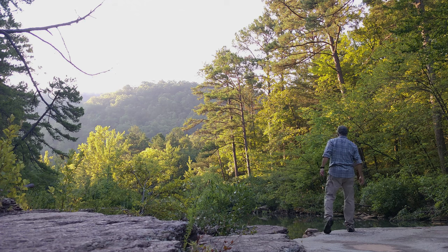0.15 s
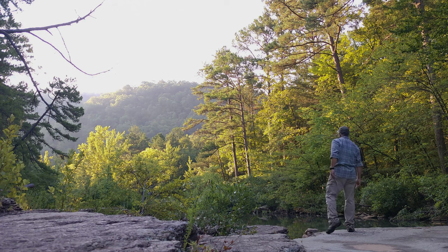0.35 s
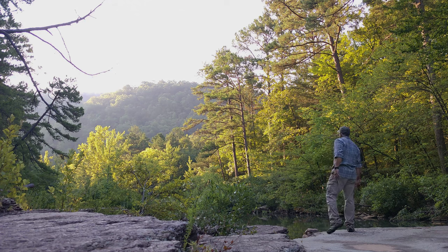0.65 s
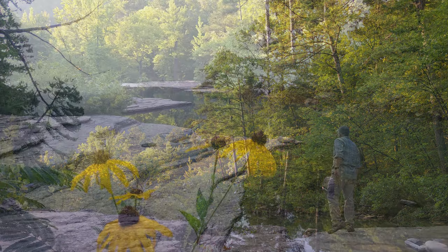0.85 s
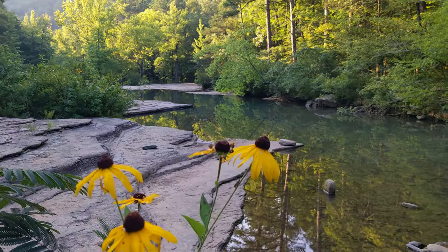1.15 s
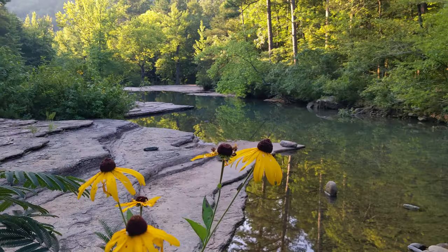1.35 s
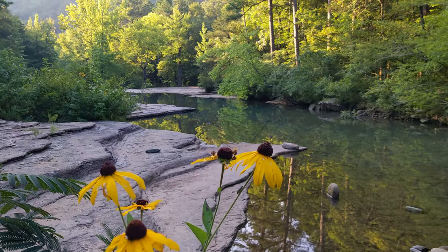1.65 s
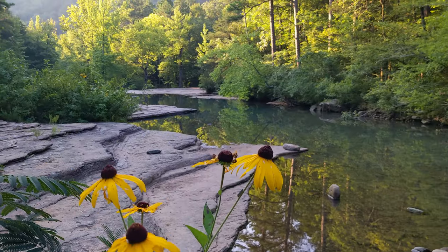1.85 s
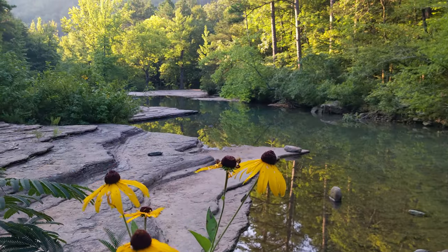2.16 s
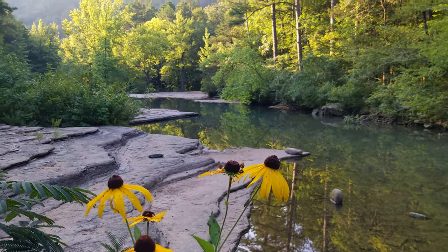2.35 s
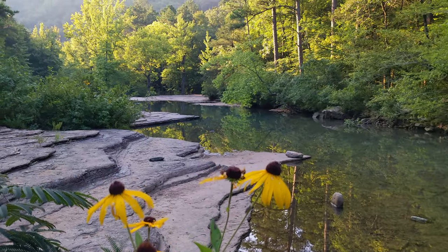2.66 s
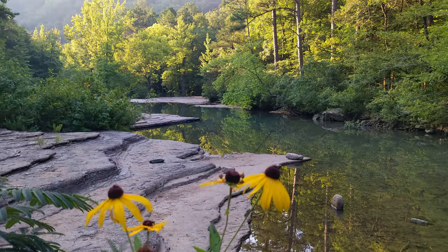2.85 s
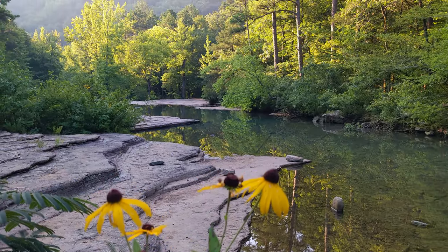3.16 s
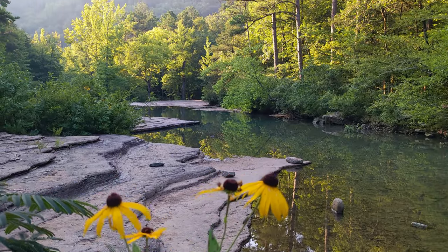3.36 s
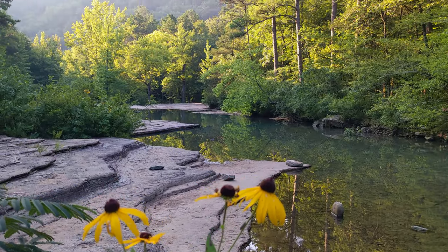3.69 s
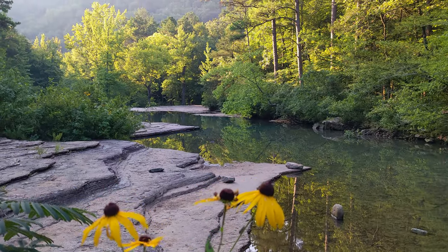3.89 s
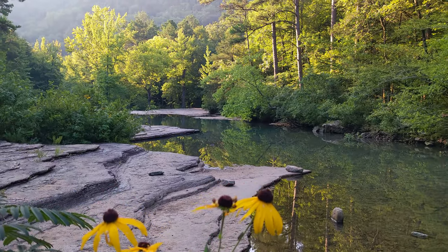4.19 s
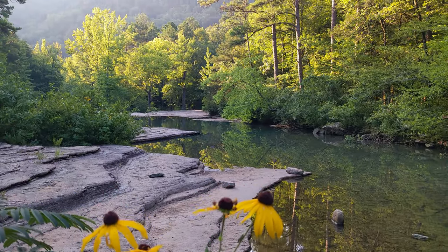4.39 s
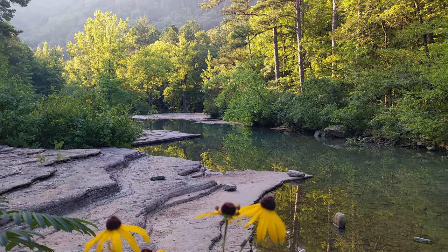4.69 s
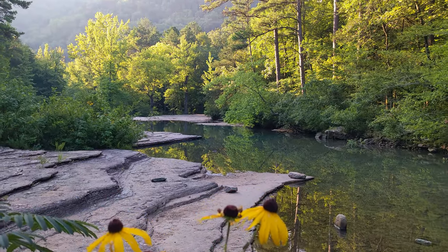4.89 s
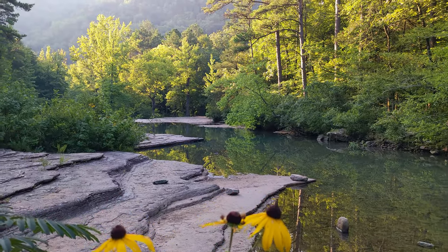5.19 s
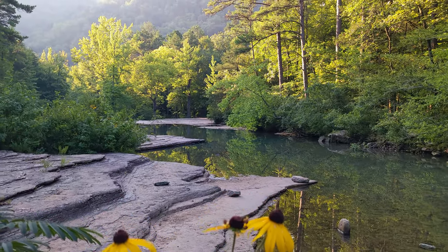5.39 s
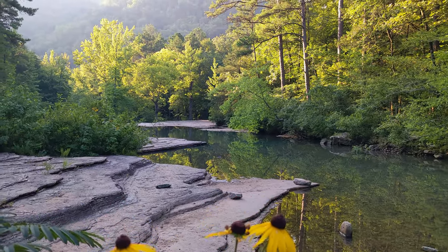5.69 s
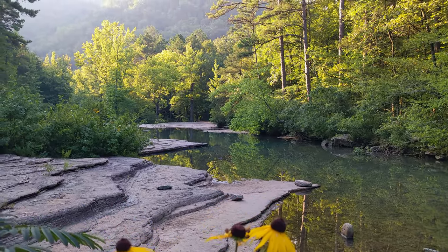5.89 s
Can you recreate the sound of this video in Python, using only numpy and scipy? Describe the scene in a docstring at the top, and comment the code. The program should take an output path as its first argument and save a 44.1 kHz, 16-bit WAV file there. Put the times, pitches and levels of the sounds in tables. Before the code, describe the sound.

From 0 to 0.9 s, an open rock ledge: soft airy noise, low rumble with a brief bump near 0.5, and blurred distant cicadas around 5 to 6 kHz, mostly to the right. An echo tail of a bird chip opens it; a sharp, quickly falling chip sounds at 0.62. At 0.9 an abrupt cut to the creek bank. A close cicada on the right buzzes steadily to the end, about 31 throbs per second, each sagging slightly in pitch; a farther, slightly faster one drifts against it over a hissing chorus. Faint bird slurs and twitter run from 0.9 to 1.8, again around 3.3 to 3.8, with a last note near 6. Quiet creek wash and tiny bubbles gradually rise. Small falling knocks tap on the left-weaker, right side at 1.0, 1.3, 1.8, 1.9, 2.4, 2.8, 3.0, a cluster near 4.5, and 5.0. Rumble swells around 5.5. Light microphone hiss leans left.

```python
"""A cicada throbs close by on the right, with a farther one slowly overtaking it, on the bank of a creek.
Each throb is a squeeze of the tymbals: a falling sine and overtones, rippled by ribs and scattered by trees.
The scene opens on a rock ledge (noise beds, three blurred cicadas), then cuts to the bank, where noise makes
a throbbing far chorus and the creek's wash, rising sines its bubbles, and falling chirps the rig's knocks.
Birds (gliding sines), a low rumble and a hiss (both shaped noise) run across both places."""
import sys
import numpy as np
from scipy import signal
from scipy.io import wavfile
from scipy.ndimage import uniform_filter1d

SR = 44100
rng = np.random.default_rng(int(sys.argv[2]) if len(sys.argv) > 2 else 0)


def store_pcm(level_fs):
    """Save levels as 16-bit WAV."""
    pcm = np.round(np.clip(level_fs, -1, 1) * 32767).astype(np.int16)
    wavfile.write(sys.argv[1], SR, np.atleast_2d(pcm).T)


N = 266364
TIME = np.arange(N) / SR  # s
CUT_S, BAND_LIMIT_HZ = 0.915, 15800

# Low rumble spectrum: freq_hz, level_db
RUMBLE_SPECTRUM = [(15, -50), (25, -31), (47, -4), (81, 1.5), (102, 2), (177, -14.5), (200, -24),
                   (260, -45), (440, -120)]
# Swells of the rumble: peak_s, half_width_s, rise_db
RUMBLE_SWELLS = [(.52, 0.034, 5.4), (5.5, 0.64, 10.7)]
# Air over the ledge, spectrum: freq_hz, level_db
LEDGE_AIR_SPECTRUM = [(94, -41), (160, -1.5), (353, -9), (402, -1), (499, -5.5), (736, -5.5), (850, -3.5),
                      (1070, -5.5), (3970, -6.5), (4460, -19), (5000, -11), (6500, -36), (11000, -120)]
# Far insects heard from the ledge, spectrum: freq_hz, level_db
LEDGE_CHORUS_SPECTRUM = [(4000, -25), (4450, -1.5), (4800, -8.5), (5600, 1), (6500, -0.5), (7200, -4),
                         (7900, -15), (8500, -15), (9500, -17.5), (10500, -30)]
# Far insects heard from the bank, spectrum: freq_hz, level_db
BANK_CHORUS_SPECTRUM = [(4500, -30), (5000, -34), (5650, 1.5), (6050, 2), (6500, -3), (6900, 0.5),
                        (7400, -7.5), (7680, -1.5), (8000, -18), (8800, -22), (10000, -31)]
# Wash of the creek, spectrum: freq_hz, level_db
CREEK_SPECTRUM = [(15, -31), (25, 6.5), (64, -8), (229, -6), (304, -8), (370, -4), (441, -6.5), (492, -3),
                  (746, -7.5), (870, -4.5), (2440, -10.5), (2720, -7), (4310, -9.5), (4700, -5.5),
                  (6110, -35), (10300, -120)]
# Lean of the creek's wash: freq_hz, left_minus_right_db
CREEK_LEAN = [(60, -0.17), (300, -0.095), (1000, -0.57), (3000, 1.9), (5000, 0.5)]
# Microphone hiss, spectrum: freq_hz, level_db
HISS_SPECTRUM = [(3000, -21), (8000, -10.5), (10000, -6.5), (12000, 0), (13000, -4), (15800, 4)]
# Likeness of the noise at the two microphones: freq_hz, correlation (-1 opposite, 0 unrelated, 1 same)
MIC_LIKENESS = [(30, -1), (120, 0.03), (500, 0.59), (1000, 0.09), (2000, 0), (16000, 0)]
# Knocks in the rig: start_s, level_db (before the rig's response), start_pitch_hz
KNOCKS = [(1.004, -59.5, 520), (1.264, -56.5, 900), (1.297, -57, 503), (1.757, -51.5, 480),
          (1.9226, -48, 2870), (2.393, -50, 706), (2.813, -52, 570), (3.017, -50, 814), (4.464, -48, 680),
          (4.543, -50.5, 760), (4.565, -55, 563), (4.576, -52.5, 630), (5.004, -48, 750)]
# Rig's response, weighting a knock as its pitch falls: pitch_hz, level_db
RIG_RESPONSE = [(80, -46), (120, -16), (190, -28.5), (270, -11), (380, -6), (600, -6), (1000, -3),
                (2500, -7)]
# Clear bird notes: start_s, length_s, start_pitch_hz, end_pitch_hz, level_db
SLURS = [(.865, 0.063, 3100, 2230, -73), (1.009, 0.042, 3000, 4500, -63), (1.05, .047, 4400, 3580, -66),
         (1.14, 0.048, 3350, 2850, -71), (1.183, 0.03, 2800, 3600, -68), (3.672, .032, 3830, 4500, -71),
         (3.828, 0.031, 3320, 3690, -66.5), (5.96, .045, 3150, 3720, -70)]
# Bouts of faint twittering: start_s, end_s
TWITTER_BOUTS = [(0.929, 1.8), (3.25, 3.6)]
# Starts of the sharp chips: start_s (a negative start leaves only the later part to be heard)
CHIP_STARTS = [-0.13, .622]
# Cicadas deep in the trees by the ledge: throbs_per_s, pitch_factor, left_db, right_db
FAR_CICADAS = [(30.2, 1.04, -63, -47.5), (31.33, 1.005, -54.5, -55.5), (30.1, 1.075, -61, -70)]
# Near cicada's tone and two overtones, each in a body resonance:
# center_hz, width_hz, left_db, right_db, scatter_db (against the direct sound)
OVERTONES = [(5420, 2500, -54.5, -42, -7), (11300, 200, -89, -79, 2), (15700, 580, -66, -103, -18)]

# Rumble: base level, and offsets for each place
RUMBLE_DB, RUMBLE_LEDGE_DB, RUMBLE_BANK_DB = -71.5, -1.6, -14.5
LEDGE_AIR_DB, CREEK_DB = -67, -65.5
# The creek starts this far down at the cut, then eases up with this time constant
FLOW_RISE_DB, FLOW_SETTLE_S = 2.5, 1.24
# Lean is left minus right: knocks fall to the right, far birds to the left
KNOCK_LEAN_DB, BIRD_LEAN_DB = -17, 6
SLUR_EASE = 1.4  # power of the glide into the last pitch
# Twitter: spacing, note length, median pitch, then log spreads of pitch and glide, and level
TWITTER_PER_S, TWITTER_S, TWITTER_HZ = 22, 0.0313, 2990
TWITTER_SPREAD, TWITTER_GLIDE, TWITTER_DB = 0.0746, 0.0714, -75.5
# Chip: pitch dives while it swells and dies, 30 dB in the attack and in the release
CHIP_TOP_HZ, CHIP_DIVE_HZ, CHIP_DIVE_POWER = 8890, 1940, 2.5
CHIP_DB, CHIP_ATTACK_S, CHIP_RELEASE_S = -45, 0.02, 0.014
# The two bank cicadas keep steady time: first throb, throbs per second
NEAR_FIRST_S, NEAR_PER_S = 0.9124, 31.09
SECOND_FIRST_S, SECOND_PER_S = 0.903, 31.59
# One throb: quick attack, a squeeze that grows louder, then the belly rings out (60 dB in RING_S)
ATTACK_S, SQUEEZE_S, SWELL_DB, RING_S = 0.0019, 0.01445, 0.5, 0.015
# Its pitch, before each cicada's factor, scoops up, then sags ever faster as the squeeze tightens
TOP_HZ, SCOOP_HZ, SCOOP_S, SAG_HZ, SAG_POWER = 5678.4, 490, 0.00081, 318, 3.0
DULLING_DB_PER_S = 1.13  # steady fade of the bank cicadas' overtones


def gain_of(db):
    """Decibels to amplitude."""
    return 10 ** (np.asarray(db) / 20)


def evened(x):
    """Scales to an rms of one."""
    return x / np.sqrt(np.mean(x ** 2) + 1e-20)


def read(points, hz):
    """Reads a curve on a log-frequency axis."""
    f, value = np.transpose(points)
    return np.interp(np.log(hz + 1), np.log(f + 1), value)


def panned(x, lean_db):
    """Spreads a sound over two channels, left minus right in dB."""
    return x * gain_of([[lean_db / 2], [-lean_db / 2]])


def add(mix, start_s, sound):
    """Adds a sound into the mix in place, trimmed at the end; a negative start is moved to zero."""
    part = mix[..., max(round(start_s * SR), 0):][..., :sound.shape[-1]]
    part += sound[..., :part.shape[-1]]


def drift(shape, size):
    """Smooth random motion of rms one along the last axis; size is the smoothing in steps."""
    once = uniform_filter1d(rng.standard_normal(shape), size)
    return evened(uniform_filter1d(once, size))


def woods(x, t60):
    """Scatter from trunks and leaves: sparse echoes dying 60 dB in t60 s, different at each microphone."""
    t = TIME[:SR]
    echoes = rng.standard_normal((2, SR)) * (rng.random((2, SR)) < 0.08)
    echoes = echoes * gain_of(-60 * t / t60) * (t > 0.004)
    echoes /= np.linalg.norm(echoes, axis=1, keepdims=True)
    return signal.fftconvolve(np.atleast_2d(x), echoes, axes=1)[:, :x.shape[-1]]


def bed(spectrum, patchy_db, same=MIC_LIKENESS, lean=((100, 0), (1000, 0)), size=1024):
    """Shaped noise with drifting patches of level, partly alike at the two microphones."""
    hz = np.fft.rfftfreq(size, 1 / SR)
    frames = N // (size // 4) + 6
    a, b, c, d, patches = rng.standard_normal((frames, len(hz), 5)).T
    patches = uniform_filter1d(patches, size=6, axis=0)
    patches = evened(uniform_filter1d(patches, size=8, axis=1))
    alike = np.clip(read(same, hz), -1, 1)[:, None]
    left = a + 1j * b
    right = alike * left + np.sqrt(1 - alike ** 2) * (c + 1j * d)
    tilt = gain_of(read(lean, hz) / 2)[:, None]
    bins = np.array([left * tilt, right / tilt])
    bins *= gain_of(read(spectrum, hz)[:, None] + patchy_db * patches)
    noise = signal.istft(bins, nperseg=size, noverlap=size * 3 // 4)[1]
    return evened(noise[:, :N])


def rumble():
    """Low noise, strong on the ledge and weaker on the bank, with brief and broad swells."""
    db = np.where(TIME < CUT_S, RUMBLE_LEDGE_DB, RUMBLE_BANK_DB)
    for peak_s, half_width_s, rise_db in RUMBLE_SWELLS:
        db = db + rise_db * np.exp(-((TIME - peak_s) / half_width_s) ** 2)
    noise = bed(RUMBLE_SPECTRUM, patchy_db=1.5, same=[(30, 0.8), (200, 0.84)], size=4096)
    return gain_of(RUMBLE_DB + db) * noise


def ledge():
    """Air and far insects over the open rock, each a bed of shaped noise."""
    air = gain_of(LEDGE_AIR_DB) * bed(LEDGE_AIR_SPECTRUM, patchy_db=1.7)
    return air + gain_of(-62.5) * bed(LEDGE_CHORUS_SPECTRUM, patchy_db=2.0)


def bank_chorus(level_db=-57, throb_db=1.9, flutter_db=1.5):
    """Countless far insects merge into a hiss that still throbs a little, about 31 times a second."""
    throb = np.sin(2 * np.pi * np.cumsum(30.8 + 1.2 * drift(N, size=4000)) / SR)
    hiss = bed(BANK_CHORUS_SPECTRUM, patchy_db=-0.15, size=512)
    hiss = hiss * gain_of(throb_db * throb + flutter_db * drift((2, N), size=200))
    return panned(gain_of(level_db) * hiss, lean_db=-2.5)


def creek(bubbles_per_s=70, bubbles_db=-82):
    """A low wash of water, with small bubbles that ring and rise in pitch."""
    t, bubbles = TIME[:2000], np.zeros((2, N))
    pitches = np.geomspace(600, 3800, num=24)
    for hz in pitches:
        ring = np.sin(2 * np.pi * hz * (t + 4 * t ** 2))
        ring = ring * np.exp(-t * hz / 7) * (1 - np.exp(-t * hz))
        births = rng.random(N) < bubbles_per_s / len(pitches) / SR
        births = births * gain_of(4.9 * np.minimum(rng.exponential(1, N), 3))
        bubbles += panned(signal.oaconvolve(births, ring)[:N], rng.normal(0, 2.6))
    trickle = gain_of(bubbles_db) * evened(bubbles + 0.57 * woods(bubbles, t60=0.42))
    wash = gain_of(CREEK_DB) * bed(CREEK_SPECTRUM, patchy_db=2.0, lean=CREEK_LEAN, size=2048)
    flow_db = -FLOW_RISE_DB * np.exp(-np.maximum(TIME - CUT_S, 0) / FLOW_SETTLE_S)
    return (wash + trickle) * gain_of(flow_db)


def rig(dispersion=2.49, rise_cycles=0.43, rattle_db=-15):
    """Bending waves in the metal arrive treble first, so each knock is a quick falling chirp."""
    t, out = TIME[:2000], np.zeros((2, N))
    for start_s, level_db, start_hz in KNOCKS:
        hz = 1 / (1 / start_hz + t / dispersion)
        rise = 1 - np.exp(-(t * start_hz / rise_cycles) ** 2)
        level = rise * gain_of(level_db + read(RIG_RESPONSE, hz))
        chirp = level * np.sin(2 * np.pi * np.cumsum(hz) / SR)
        add(out, start_s, panned(chirp, KNOCK_LEAN_DB))
    dull = signal.sosfilt(signal.butter(2, 450, fs=SR, output="sos"), out)
    return out + gain_of(rattle_db) * woods(dull, t60=0.21)


def twitter():
    """Faint slurs at random pitches, loosely spaced through each bout."""
    bouts = [np.arange(start_s, end_s, 1 / TWITTER_PER_S) for start_s, end_s in TWITTER_BOUTS]
    times = np.concatenate(bouts)
    for start_s, (late, high, glide) in zip(times, rng.standard_normal((len(times), 3))):
        start_hz = TWITTER_HZ * np.exp(TWITTER_SPREAD * high)
        end_hz = start_hz * np.exp(TWITTER_GLIDE * glide)
        yield start_s + 0.015 * late, TWITTER_S, start_hz, end_hz, TWITTER_DB


def whistles(wet_db=-1, flutter_db=4.0, waver=0.011):
    """Far birds glide through short, unsteady notes that the trees blur."""
    song = np.zeros((2, N))
    for start_s, length_s, start_hz, end_hz, level_db in [*SLURS, *twitter()]:
        u = np.linspace(0, 1, round(length_s * SR))
        wobble, flutter = drift((2, SR), size=150)[:, :len(u)]
        hz = end_hz + (start_hz - end_hz) * (1 - u) ** SLUR_EASE
        hz = hz * (1 + waver * wobble)
        level = gain_of(level_db + flutter_db * flutter) * signal.windows.tukey(len(u), 0.5)
        note = level * np.sin(2 * np.pi * np.cumsum(hz) / SR)
        add(song, start_s, panned(note, BIRD_LEAN_DB))
    return song + gain_of(wet_db) * woods(song, t60=1.5)


def chips(wet_db=-3):
    """A nearer bird's quick falling chip, with its tail of echoes."""
    t, out = TIME[:SR], np.zeros((2, N))
    dive = np.minimum(t / (CHIP_ATTACK_S + CHIP_RELEASE_S), 1) ** CHIP_DIVE_POWER
    hz = CHIP_TOP_HZ - CHIP_DIVE_HZ * dive
    from_peak = np.maximum(1 - t / CHIP_ATTACK_S, (t - CHIP_ATTACK_S) / CHIP_RELEASE_S)
    chip = gain_of(CHIP_DB - 30 * from_peak) * np.sin(2 * np.pi * np.cumsum(hz) / SR)
    heard = panned(chip + gain_of(wet_db) * woods(chip, t60=0.64), lean_db=-3.0)
    for start_s in CHIP_STARTS:
        add(out, start_s, heard[:, max(-round(start_s * SR), 0):])
    return out


def cicada(starts, pitch, jitter, waver, flutter_db, length, slip=0.96, rib_hz=172, rib_depth=0.42,
           last_rib_s=0.0137, rib_wander=0.64, hold=0.89):
    """Each squeeze of the tymbals buckles a few ribs and rings the belly; returns one track per overtone."""
    t = TIME[:round(np.mean(np.diff(starts)) * SR)]
    shape = (len(starts), len(t))  # throbs by samples
    squeeze = np.minimum(t / SQUEEZE_S, 1.25)
    hz = TOP_HZ - SCOOP_HZ * np.exp(-t / SCOOP_S) - SAG_HZ * squeeze ** SAG_POWER
    db = SWELL_DB * squeeze - 60 * np.maximum(t - SQUEEZE_S, 0) / RING_S
    detune, slips = rng.standard_normal((2, len(starts), 1))
    tone_hz = pitch * hz * (1 + jitter * detune + waver * drift(shape, size=50))
    rib_wobble = rib_wander * drift(len(starts), size=6)[:, None]
    rib_angle = 2 * np.pi * rib_hz * (t - last_rib_s) + rib_wobble
    ribs = 1 + rib_depth * squeeze * np.cos(rib_angle)
    flutter = flutter_db * drift(shape, size=70)
    level = np.minimum(t / ATTACK_S, 1) * abs(ribs) * gain_of(db + flutter)
    level /= np.linalg.norm(level, axis=1, keepdims=True)  # every squeeze has the same strength
    # the ring's phase slips from throb to throb
    angle = np.cumsum(slip * slips, axis=0) + 2 * np.pi * np.cumsum(tone_hz, axis=1) / SR
    out = np.zeros((len(OVERTONES), length))
    for start_s, envelope, turn in zip(starts, level, angle):
        # hold reshapes the overtones: below 1 they keep up through the quiet parts, above 1 they drop
        throb = [envelope ** (hold if k else 1) * np.sin((k + 1) * turn) for k in range(len(OVERTONES))]
        add(out, start_s, np.array(throb))
    return np.array([evened(track) for track in out])


def far_cicadas(direct_db=-2, octave_left_db=-28, octave_right_db=-22):
    """Three cicadas, already in full song, their throbs blurred by the trees."""
    out = np.zeros((2, N))
    for throbs_per_s, pitch, left_db, right_db in FAR_CICADAS:
        starts = np.arange(0, 2, 1 / throbs_per_s)
        tone, octave, _ = cicada(starts, pitch, jitter=0.0033, waver=0.0086, flutter_db=1.0, length=2 * SR)
        voice = tone + gain_of([[octave_left_db], [octave_right_db]]) * octave
        direct = np.array([voice[0], np.roll(voice[1], 4)])  # right lags by 4 samples
        heard = evened(woods(voice, t60=0.93) + gain_of(direct_db) * direct)
        # skip the first second, while the echoes build up
        add(out, 0, gain_of([[left_db], [right_db]]) * heard[:, SR:])
    return out


def dulling():
    """Gain of the bank cicadas' overtones, falling steadily in dB."""
    return gain_of(-DULLING_DB_PER_S * (TIME - TIME.mean()))


def second_cicada(pitch=1.017, tone_db=-60, octave_db=-78.5, belly_hz=11420, belly_width_hz=380,
                  lean_db=1, scatter_db=-8):
    """A farther cicada, slightly higher and faster, with an octave that its belly rings on."""
    starts = np.arange(SECOND_FIRST_S, N / SR, 1 / SECOND_PER_S)
    tone, octave, _ = cicada(starts, pitch, jitter=0.0039, waver=0.0061, flutter_db=0.8, length=N, hold=1.3)
    belly = signal.iirpeak(belly_hz, belly_hz / belly_width_hz, SR)
    octave = evened(signal.lfilter(*belly, octave))
    voice = gain_of(tone_db) * tone + gain_of(octave_db) * dulling() * octave
    return panned(voice + gain_of(scatter_db) * woods(voice, t60=0.43), lean_db)


def near_cicada():
    """One cicada on the right: body resonances color the tone and overtones, and the trees scatter them."""
    starts = np.arange(NEAR_FIRST_S, N / SR, 1 / NEAR_PER_S)
    tracks = cicada(starts, pitch=1.0, jitter=0.0018, waver=0.0049, flutter_db=2.14, length=N)
    tracks[1:] *= dulling()
    turn = np.pi * TIME / 2  # the scatter turns slowly between two sets of echoes
    out = np.zeros((2, N))
    for track, (center_hz, width_hz, left_db, right_db, scatter_db) in zip(tracks, OVERTONES):
        resonance = signal.iirpeak(center_hz, center_hz / width_hz, SR)
        voice = evened(signal.lfilter(*resonance, track))
        direct = np.array([voice, np.roll(voice, 4)])  # right lags by 4 samples
        scatter = evened(np.cos(turn) * woods(voice, t60=0.5) + np.sin(turn) * woods(voice, t60=0.29))
        # the left microphone, turned away, hears relatively more scatter
        scatter = panned(scatter, lean_db=8.5)
        out += gain_of([[left_db], [right_db]]) * (direct + gain_of(scatter_db) * scatter)
    return out


def scene():
    """The ledge until the cut, then the bank; birds and rumble run across both, rig knocks only on the bank."""
    bank = near_cicada() + second_cicada() + bank_chorus() + creek()
    places = np.where(TIME < CUT_S, ledge() + far_cicadas(), bank)
    return places + rumble() + whistles() + chips() + rig()


def record(dry):
    """Microphone hiss, stronger on the left, then the band limit."""
    hiss = gain_of(-71.5) * bed(HISS_SPECTRUM, patchy_db=1.0)
    noisy = dry + panned(hiss, lean_db=15.0)
    lowpass = signal.firwin(801, BAND_LIMIT_HZ, window=("kaiser", 9), fs=SR)
    return signal.oaconvolve(noisy, lowpass[None], "same")


dry = scene()
out = record(dry)
store_pcm(out)
```